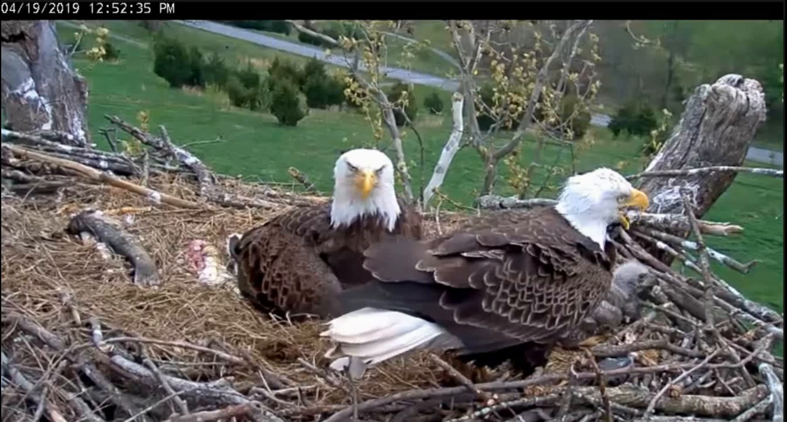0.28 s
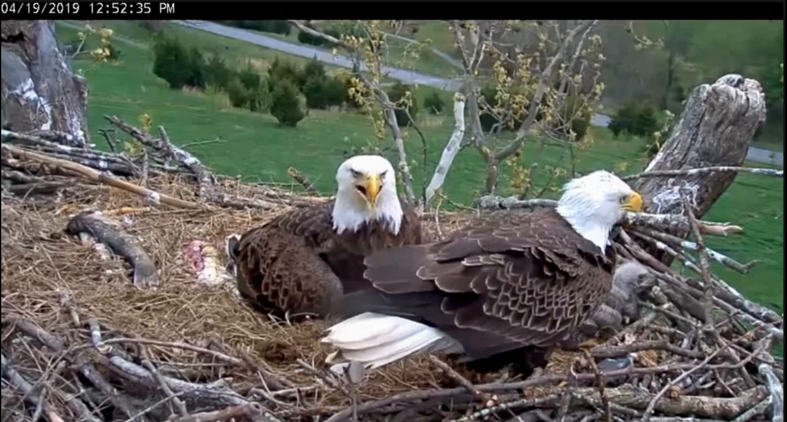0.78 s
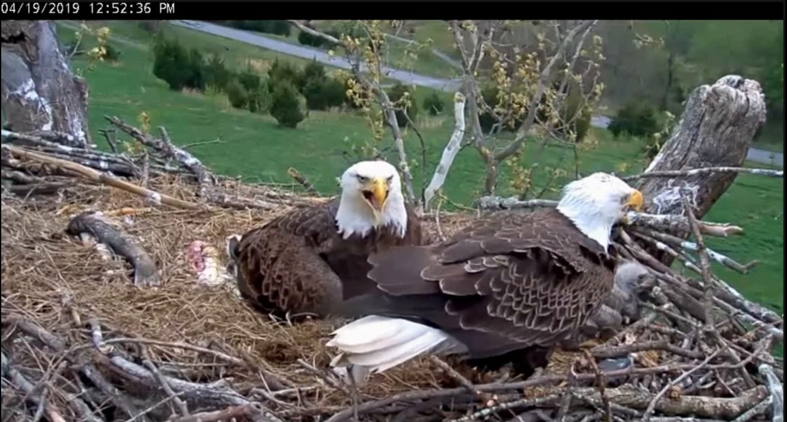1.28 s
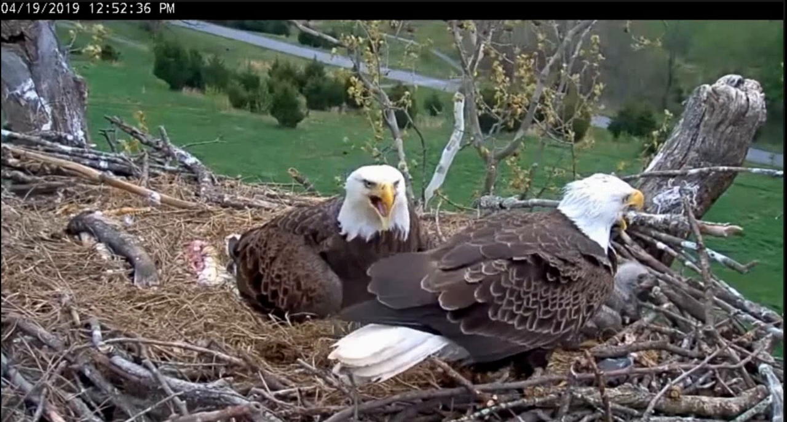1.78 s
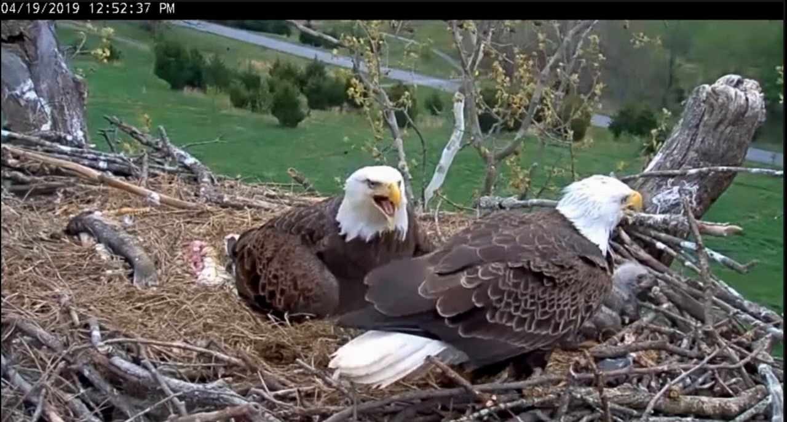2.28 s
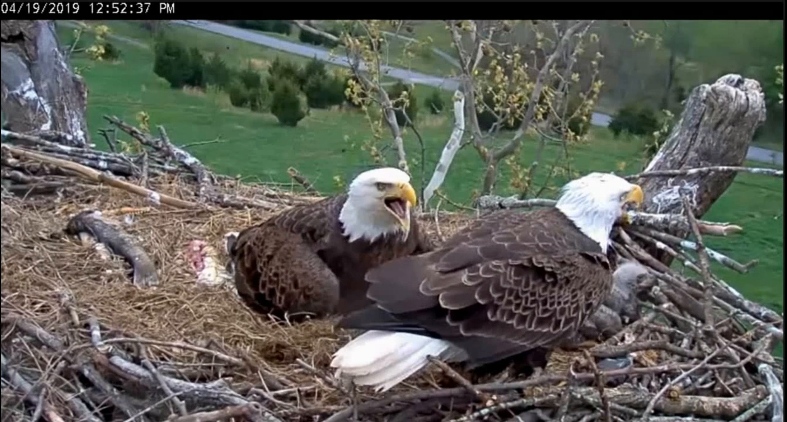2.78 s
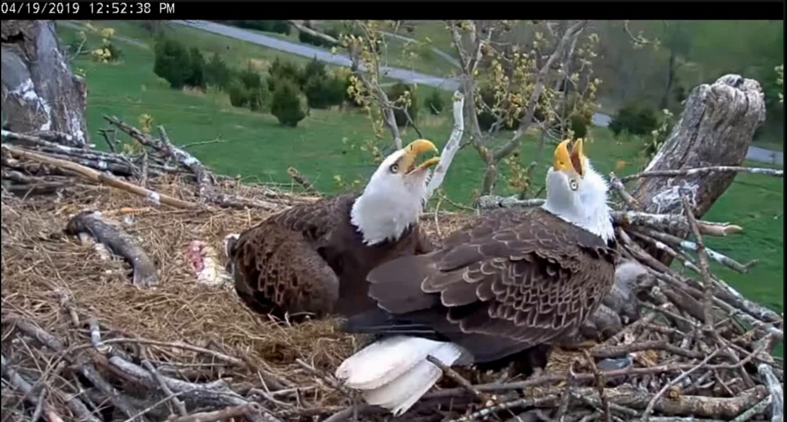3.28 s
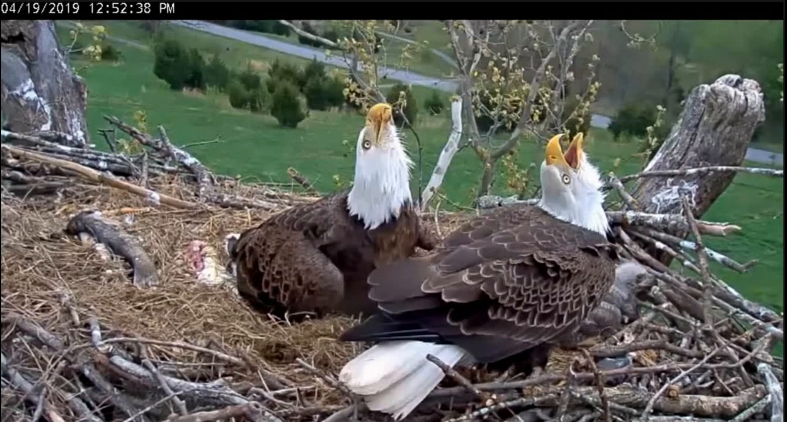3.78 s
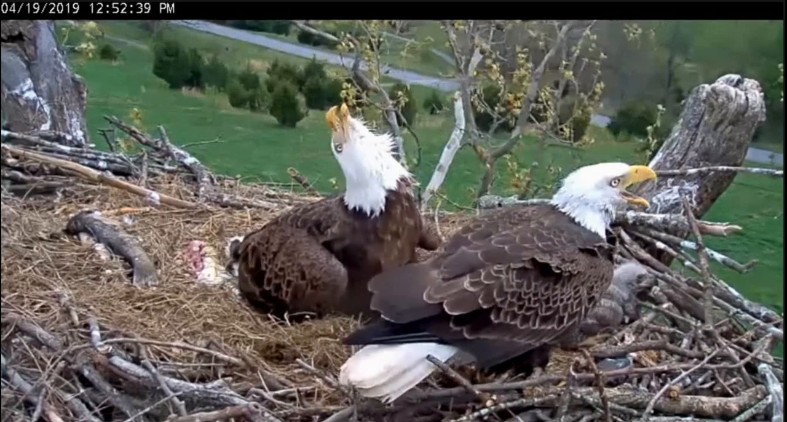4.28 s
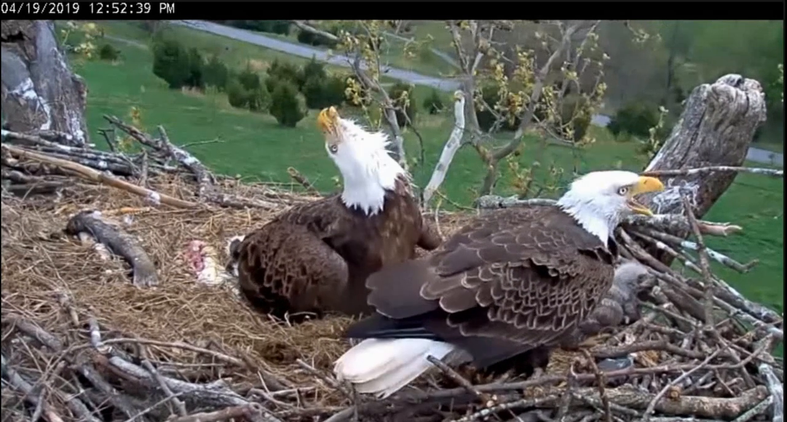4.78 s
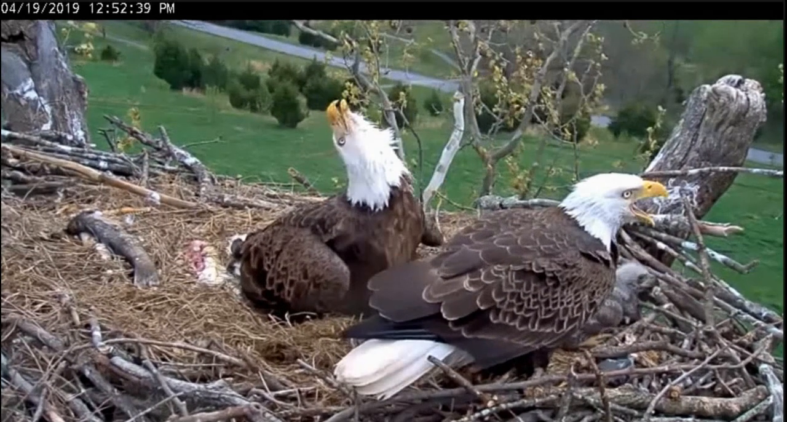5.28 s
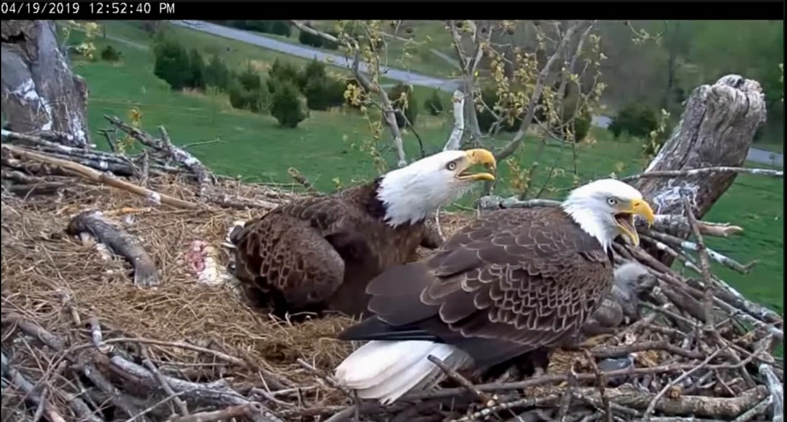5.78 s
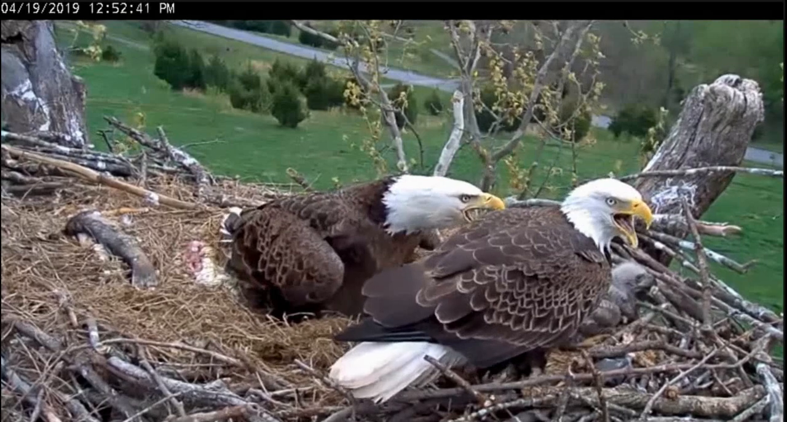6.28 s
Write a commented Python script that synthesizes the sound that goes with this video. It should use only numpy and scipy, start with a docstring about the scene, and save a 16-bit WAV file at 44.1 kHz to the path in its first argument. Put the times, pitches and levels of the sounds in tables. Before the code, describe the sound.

Two eagles give high piping peals, soft clucks and quick rasping squeaks close by, over wind rumbling on the microphone and faint songbirds.

```python
"""Bald eagles on their nest

Two eagles call close by: long piping peals, soft clucks, thin squeaks, then quick rasping runs.
The voice is a vibrating membrane that frays into noise when hoarse; open beaks hiss and clack shut.
A faint, broad hiss lingers around and after the opening peals.
Two far songbirds whistle, one speeding up into a trill; wind rumbles and thumps on the microphone."""
import sys
import numpy as np
from scipy import signal
from scipy.fft import rfft, irfft
from scipy.io import wavfile
from scipy.ndimage import map_coordinates

SR = 44100
rng = np.random.default_rng(int(sys.argv[2]) if len(sys.argv) > 2 else 0)


def int16_out(signal):
    """Quantize to a 16-bit WAV file."""
    q = np.round(np.clip(np.atleast_2d(signal).T, -1, 1) * 32767)
    wavfile.write(sys.argv[1], SR, q.astype(np.int16))


N = 289296
TIME = np.arange(N) / SR

# short hoarse notes: (time [s], length [s], start pitch [Hz], end pitch [Hz], base level [dB],
# octave boost [dB], third partial boost [dB]); a partial is one pure tone within a note
CLUCK_NOTES = [(0.072, 0.038, 1450, 1664, -31.5, 6, -1), (0.554, 0.029, 1432, 1620, -30.5, 9, -20.5),
               (0.89, 0.014, 1253, 1625, -36, 9.5, -1), (1.213, 0.025, 1043, 1140, -34, -21, -20),
               (1.221, 0.035, 2170, 2240, -34.5, -4.5, -24), (1.461, 0.012, 1020, 1000, -38.5, -15, -19),
               (1.582, 0.034, 2124, 2060, -38, -12, -18), (1.938, 0.036, 2173, 2190, -36, -0.5, -11),
               (2.206, 0.047, 2170, 2184, -38.5, -1, -0.5), (2.45, 0.042, 2380, 1960, -38.5, -3, -1.5),
               (2.685, 0.044, 2556, 2440, -37.5, -2.5, -16), (2.932, 0.041, 2650, 2360, -35, -0.5, -31),
               (3.188, 0.023, 2780, 2500, -29.5, -12, -35), (3.204, 0.021, 3070, 2610, -32, -15, -34),
               (4.591, 0.022, 3234, 2870, -42.5, -22, -24), (4.726, 0.017, 2240, 1750, -35, -19, -18.5),
               (4.817, 0.023, 2250, 2010, -34.5, -5, -11), (4.904, 0.014, 2250, 2060, -35.5, -5, -13),
               (6.264, 0.006, 2830, 2750, -32.5, -8, -30.5), (6.486, 0.03, 2260, 1920, -35.5, -11, -31)]


def pipes(third_db=-21, leak_db=-11, slack_db=10):
    """Peals and pipes: an arching whistle, firm while pushed, breaking into a rasp as it fades."""
    # two long peals and a rising yelp, one curve each: (time [s], pitch [Hz], level [dB])
    peal_curves = [
        [(0.092, 2466, -25.5), (0.106, 2555, -22.5), (0.134, 2602, -21), (0.156, 2546, -20.5),
         (0.196, 2358, -25.5), (0.224, 2473, -20), (0.244, 2448, -22), (0.264, 2390, -29.5), (0.274, 2230, -45)],
        [(0.571, 2610, -30.5), (0.581, 2490, -19.5), (0.603, 2605, -22), (0.621, 2505, -21.5),
         (0.651, 2373, -33.5), (0.662, 2380, -38)],
        [(0.897, 2240, -37), (0.904, 2285, -24), (0.916, 2486, -23.5), (0.921, 2580, -36), (0.94, 2480, -63)],
    ]
    # short notes: (time [s], length [s], hold [s], start pitch [Hz], end pitch [Hz], arch [Hz],
    # level [dB], octave's peak level [dB])
    pip_notes = [(0.685, 0.048, 0.026, 2486, 2447, 25, -25, -29.5),
                 (4.389, 0.021, 0.013, 2827, 2820, 17, -30, -45),
                 (4.404, 0.069, 0.03, 2430, 1994, -18.5, -35, -57),
                 (4.467, 0.096, 0.029, 2893, 2815, 93.5, -30, -28.5),
                 (4.574, 0.065, 0.011, 2896, 2996, -4.5, -30.5, -29),
                 (4.685, 0.079, 0.024, 2872, 2860, 17, -28.5, -33),
                 (4.798, 0.07, 0.012, 2766, 2810, -3, -34, -38.5),
                 (5.983, 0.054, 0.036, 2900, 2690, 69.5, -31.5, -40.5),
                 (6.029, 0.11, 0.083, 2743, 2760, 231, -30.5, -31.5),
                 (6.158, 0.078, 0.038, 2890, 2736, 110.5, -30.5, -31.5),
                 (6.275, 0.058, 0.033, 2917, 2800, 30, -32.5, -36),
                 (6.36, 0.071, 0.017, 2774, 2780, 15, -29.5, -36.5),
                 (6.465, 0.051, 0.0043, 2780, 2760, 6, -33, -41.5)]
    # the voices grow hoarser: (time [s], roughness [0-1])
    hoarseness = [(0, .2), (1, .2), (4.4, .41), (6.1, .45), (6.5, .6)]
    # air leaking past a hoarse note: (frequency [Hz], level [dB])
    leak_colour = [(400, -9), (1500, 13.5), (2400, 29), (3600, -13), (4500, -26), (5700, 4.5),
                   (7000, -26.5)]
    out = np.zeros(N)
    shake = unrest(jitter=.024, jitter_hz=280, flutter_db=15, flutter_hz=200)
    low_eddies, high_eddies, air = eddies(190), eddies(215), noise(leak_colour)
    for t, hz, level_db, octave_db in [peal(c) for c in peal_curves] + [pip(*n) for n in pip_notes]:
        at = np.rint(t * SR).astype(int)
        rough = np.interp(t, *np.transpose(hoarseness))
        # the note frays into noise as its push slackens, the octave first
        slack = np.minimum((level_db.max() - level_db) / slack_db, 1)
        fray = rough ** 2 * (.25 + 3.5 * slack)
        low, octave, third = syrinx(at, hz, rough, shake)
        low = blend(low, frayed(low_eddies[at], hz), fray)
        octave = blend(octave, frayed(high_eddies[at], 2 * hz), fray + .2)
        voice = gain_of(level_db) * low + gain_of(octave_db) * (octave + gain_of(third_db) * third)
        leak = gain_of(level_db + leak_db) * rough ** 1.5 * air[at]
        add(out, t[0], (voice + leak) * signal.windows.tukey(len(at), .06))
    return out


def peal(curve):
    """A long wavering note: returns its times, pitch, level and octave level."""
    # higher is brighter: (pitch [Hz], octave compared with the lowest partial [dB])
    brightness = [(2320, -16.5), (2460, -8.5), (2560, -6)]
    s, pitch, level_db = np.transpose(curve)
    at, _ = span(s[0], s[-1] - s[0])
    t = TIME[at]
    place = np.interp(t, s, np.arange(len(s)))
    hz = map_coordinates(pitch, [place], order=2, mode="nearest")  # rounded bends
    db = np.interp(t, s, level_db)
    return t, hz, db, db + look_up(brightness, hz)


def pip(s, length, hold, start_hz, end_hz, arch_hz, db, octave_db, attack_s=.0035, quiet_db=-31.5):
    """A short arching note that starts fast, holds, then fades; returns the same curves as peal."""
    at, u = span(s, length)
    held = np.clip(hold / length, .05, .95)
    hz = start_hz + (end_hz - start_hz) * u + arch_hz * np.sin(np.pi * u) ** 2
    onset_db = quiet_db * np.maximum(1 - u * length / attack_s, 0) ** 2
    fade_db = np.interp(u, [held, 1], [0, quiet_db])
    bloom_db = np.interp(u, [0, .78 * held, 1], [-16, 0, -28])  # the octave peaks late in the hold
    return TIME[at], hz, db + onset_db + fade_db, octave_db + onset_db + bloom_db


def clucks(fade_db=-11, bloom_db=7):
    """Lower notes from a slack voice box: they catch and die away, overtones ringing in the windpipe."""
    # a weak push is hoarser: (level [dB], roughness [0-1])
    hoarseness = [(-43, .62), (-36, .52), (-32, .28), (-22, .24)]
    out, turbulence = np.zeros(N), eddies(420)
    shake = unrest(jitter=.095, jitter_hz=380, flutter_db=14, flutter_hz=220)
    for s, length, start_hz, end_hz, db, octave_db, third_db in CLUCK_NOTES:
        at, u = span(s, length)
        rough = np.interp(db, *np.transpose(hoarseness))
        hz = start_hz + (end_hz - start_hz) * u
        low, octave, third = syrinx(at, hz, rough, shake)
        low = blend(low, frayed(turbulence[at], hz), 1.5 * rough ** 2)
        overtones = gain_of(octave_db) * windpipe(octave, through=.15)
        overtones += gain_of(third_db) * windpipe(third, through=.15)
        voice = low + gain_of(bloom_db * (u - 1.5)) * overtones
        add(out, s, swell(u, rise=.33) * gain_of(db + fade_db * u) * voice)
    return out


def squeaks():
    """The voice cracks into one high, harsh partial, about half noise, that rings in the windpipe."""
    # cracked notes: (time [s], length [s], start pitch [Hz], end pitch [Hz], level [dB])
    notes = [(0.403, 0.079, 4270, 4520, -44), (0.467, 0.13, 4560, 4600, -45.5),
             (0.669, 0.015, 5850, 6640, -36.5), (0.677, 0.034, 6600, 7170, -38.5),
             (0.9, 0.0093, 3780, 3870, -38.5), (0.91, 0.031, 4850, 5060, -42.5),
             (1.447, 0.023, 4640, 4500, -32.5), (3.128, 0.03, 4920, 5500, -43.5),
             (3.154, 0.04, 4900, 4340, -38.5), (3.198, 0.096, 5860, 5900, -46),
             (3.236, 0.077, 4760, 4700, -38.5), (3.342, 0.016, 4520, 4250, -35),
             (3.359, 0.023, 4700, 4530, -44.5), (4.383, 0.069, 5820, 6040, -43),
             (4.776, 0.081, 4340, 4590, -42), (4.896, 0.029, 4540, 4620, -32),
             (4.912, 0.031, 4770, 4670, -26), (4.913, 0.023, 5650, 5600, -39),
             (4.925, 0.0069, 6370, 6470, -40), (5.023, 0.023, 4400, 4410, -21),
             (5.043, 0.014, 4450, 4570, -25), (5.152, 0.0091, 4380, 4100, -33),
             (5.16, 0.015, 4410, 4340, -28.5)]
    # middling squeaks are the hoarsest: (level [dB], roughness [0-1])
    hoarseness = [(-46, .36), (-41, .55), (-22, .36)]
    out, turbulence = np.zeros(N), eddies(300)
    shake = unrest(jitter=.07, jitter_hz=420, flutter_db=12, flutter_hz=240)
    for s, length, start_hz, end_hz, db in notes:
        at, u = span(s, length)
        rough = np.interp(db, *np.transpose(hoarseness))
        hz = start_hz + (end_hz - start_hz) * u
        tone = syrinx(at, hz, rough, shake)[0]
        voice = blend(tone, frayed(turbulence[at], hz), rough)
        add(out, s, gain_of(db) * swell(u, rise=.22) * windpipe(voice, through=.25))
    return out


def syrinx(at, hz, rough, shake, dip=.57):
    """A bird's voice box: a membrane's three partials. Roughness shakes the pitch and dips the level."""
    jitter, flutter_db = shake
    phase = 2 * np.pi * np.cumsum(hz * (1 + rough * jitter[at])) / SR
    swings = [evened(gain_of(dip * rough * np.minimum(db[at], 0))) for db in flutter_db]
    return [np.sqrt(2) * swing * np.sin(k * phase) for k, swing in enumerate(swings, 1)]


def unrest(jitter, jitter_hz, flutter_db, flutter_hz):
    """The membrane moves unevenly: one pitch shake, and a level flutter for each of three partials."""
    return jitter * wobble(jitter_hz), flutter_db * np.array([wobble(flutter_hz) for _ in range(3)])


def eddies(hz):
    """Swirling air that smears a partial over about this many Hz each way."""
    return (wobble(hz) + 1j * wobble(hz)) / np.sqrt(2)


def frayed(turbulence, hz):
    """A partial that has broken up into a narrow band of noise."""
    return evened((turbulence * np.exp(2j * np.pi * np.cumsum(hz) / SR)).real)


def windpipe(x, through=0):
    """The windpipe rings at its own pitches; some of the sound can pass straight through."""
    # where the tube rings: (frequency [Hz], width [Hz], level [dB])
    resonances = [(2150, 420, -8), (3620, 380, -6), (4560, 400, 0), (5650, 440, 0), (6620, 440, -1)]
    hz = np.fft.rfftfreq(len(x), 1 / SR)
    tube = sum(gain_of(db) / (1 + ((hz - f) / width * 2) ** 2) for f, width, db in resonances)
    return evened(irfft(rfft(x) * (tube + through), len(x)))


def hisses(flutter_db=2):
    """Swells of hiss: broad noise mixed with a rasp that rings at the windpipe's pitches."""
    # first a faint, broad hiss lingering around and after the opening peals, then air through open
    # beaks: (time [s], length [s], level [dB], share that rings [0-1])
    swells = [(0.248, 0.83, -52, 0.1), (0.535, 0.052, -43, 0), (0.845, 0.41, -42.5, 0.02),
              (1.179, 0.29, -50.5, 0.01), (1.445, 0.18, -43, 0.27), (1.572, 0.013, -42.5, 0),
              (1.939, 0.12, -47, 0.7), (3.106, 0.22, -44.5, 0.2), (3.345, 0.048, -53, 0.9),
              (4.371, 0.093, -46, 0.9), (4.587, 0.061, -54.5, 0), (4.756, 0.076, -45, 0.1),
              (4.882, 0.071, -37, 0.98), (5.002, 0.052, -42.5, 0), (5.133, 0.057, -44, 0),
              (5.266, 0.075, -54.5, 0.22), (5.927, 0.12, -48, 0.2)]
    # the broad hiss: (frequency [Hz], level [dB])
    hiss_colour = [(300, 23), (1000, 7.5), (2200, 7), (3300, 7.5), (4500, 0), (6500, -16), (7400, -32)]
    puffs = [(s - .0045, .07, -53, .033) for s, *_ in CLUCK_NOTES]  # one with every cluck
    out, broad = np.zeros(N), noise(hiss_colour)
    ringing = windpipe(windpipe(rng.standard_normal(N)), through=.6)
    for s, length, db, share in list(swells) + puffs:
        at, u = span(s, length)
        add(out, s, gain_of(db) * swell(u, rise=.44) * blend(broad[at], ringing[at], share))
    return out * gain_of(flutter_db * wobble(48))


def clacks(attack_s=.0013):
    """The beak shuts: a hollow knock, with a bright crack when it snaps hard."""
    # hard, then soft: (time [s], time to fade 60 dB [s], level [dB], crack compared with knock [dB])
    snaps = [(1.199, 0.031, -33, 0.5), (1.214, 0.031, -35, -5.5), (2.026, 0.045, -45, -16),
             (2.28, 0.084, -45.5, -19.5), (2.519, 0.068, -45.5, -14.5), (2.755, 0.18, -49, -19),
             (3.006, 0.064, -45.5, -20)]
    # the hollow mouth: (frequency [Hz], level [dB])
    knock_colour = [(300, -9), (650, 5), (1080, -8), (1450, -3.5), (3200, -23), (5000, -30.5)]
    # the bright crack: (frequency [Hz], level [dB])
    crack_colour = [(800, -19), (2700, 1.5), (4200, -3.5), (5400, 5.5), (7100, 0.5), (7600, -21.5)]
    out, knock, crack = np.zeros(N), noise(knock_colour), noise(crack_colour)
    for s, fade_s, db, crack_db in snaps:
        at, u = span(s, fade_s)
        envelope = np.minimum(u * fade_s / attack_s, 1) * np.exp(-np.log(1000) * u)
        add(out, s, gain_of(db) * envelope * (evened(knock[at]) + gain_of(crack_db) * crack[at]))
    return out


def songbirds(whistle_hz=3810, fall_hz=83, sink_hz_per_s=69, vary_hz=30):
    """Two songbirds sing pure notes that slide quickly at first, then more slowly."""
    # one slides upward, quickening into a loose trill: (time [s], length [s], level [dB])
    slides = [(2.336, 0.28, -58.5), (2.655, 0.27, -58), (3.013, 0.17, -53), (3.281, 0.13, -50),
              (3.518, 0.21, -53.5), (3.692, 0.079, -52.5), (3.786, 0.043, -65), (3.911, 0.042, -53.5),
              (4.008, 0.045, -53.5), (4.093, 0.054, -56), (4.17, 0.062, -52), (4.246, .052, -49.5),
              (4.332, .042, -55), (4.435, 0.063, -52), (4.557, 0.058, -47.5), (4.639, 0.054, -48),
              (4.744, 0.022, -45)]
    # its slides widen: (time [s], start pitch [Hz], end pitch [Hz])
    slide_range = [(2.35, 3625, 3416), (2.651, 3305, 3446), (3.281, 3324, 3480), (3.521, 3270, 3745),
                   (3.7, 3216, 3730), (3.999, 3080, 3860), (4.2, 3256, 3870)]
    # the other's falling whistles, each lower than the last: (time [s], length [s], level [dB])
    whistles = [(1.695, 0.28, -67), (2.045, 0.4, -67), (2.276, 0.22, -60), (2.607, 0.098, -52.5),
                (2.963, 0.16, -53.5), (3.227, 0.076, -48.5), (3.432, 0.097, -51.5)]
    out, notes = np.zeros(N), []
    when, low_hz, high_hz = np.transpose(slide_range)
    for s, length, db in slides:
        glide_hz = np.interp(s, when, high_hz - low_hz) + vary_hz * rng.standard_normal()
        notes.append((s, length, db, np.interp(s, when, low_hz), glide_hz))
    for s, length, db in whistles:
        notes.append((s, length, db, whistle_hz - sink_hz_per_s * (s - whistles[0][0]), -fall_hz))
    for s, length, db, start_hz, glide_hz in notes:
        _, u = span(s, length)
        hz = start_hz + glide_hz * u ** .75
        tone = np.sqrt(2) * np.sin(2 * np.pi * np.cumsum(hz) / SR)
        add(out, s, gain_of(db) * swell(u, rise=.55) * tone)
    return out


def wind():
    """Swirling air shakes the microphone: a rumble, a lumpy flutter, and a rush in strong gusts."""
    # the wind rises and falls: (time [s], strength [dB])
    gusts = [(0.05, -33.5), (0.1, -41.5), (0.55, -28.5), (0.73, -40.5), (1.07, -32.5), (1.3, -47.5),
             (1.39, -38.5), (2.0, -42), (2.27, -28.5), (2.41, -47), (2.62, -31), (2.74, -34.5), (2.92, -32),
             (3.04, -27), (3.12, -29), (3.22, -24.5), (3.42, -32.5), (3.73, -37.5), (3.89, -31.5),
             (3.91, -44.5), (4.63, -48), (4.7, -29), (4.86, -33), (4.98, -26), (5.09, -25.5), (5.36, -34),
             (5.92, -35.5), (5.97, -27), (6.04, -34.5), (6.24, -23.5), (6.52, -21.5)]
    # the deep rumble: (frequency [Hz], level [dB])
    rumble_colour = [(10, -16.5), (18, 9), (30, -2), (48, 1), (70, -4), (100, -6.5), (150, -21.5),
                     (300, -48.5), (1000, -99.5)]
    # the flutter above it: (frequency [Hz], level [dB])
    flutter_colour = [(40, -6), (90, -0.5), (140, 10.5), (210, 2), (310, -6.5), (430, -18), (700, -27.5),
                      (1200, -35.5), (2500, -41), (7000, -68.5)]
    # strong gusts reach higher: (frequency [Hz], level [dB])
    rush_colour = [(120, -35.5), (230, -2), (320, 7), (450, -9), (700, -16.5), (1400, -67)]
    gust_db = np.interp(TIME, *np.transpose(gusts))
    lumps = evened(gain_of(1.8 * wobble(24)))
    rumble = noise(rumble_colour) * gain_of(-22 + .64 * (gust_db + 33.5))  # follows gusts gently
    flutter = noise(flutter_colour) * gain_of(gust_db - 3)
    rush = noise(rush_colour) * gain_of(-42 + 2.34 * (gust_db + 26))  # follows them steeply
    return rumble + lumps * (flutter + rush)


def thumps():
    """Single swirls of air strike the microphone with short, dull thumps."""
    # each strike: (time [s], length [s], level [dB])
    strikes = [(0.011, 0.059, -33), (0.179, 0.026, -32.5), (0.54, 0.031, -25.5), (0.845, 0.041, -27),
               (0.962, 0.028, -35.5), (2.025, 0.049, -34), (2.257, 0.037, -35.5), (2.656, 0.053, -24),
               (2.779, 0.041, -27), (2.843, 0.045, -24), (2.952, 0.083, -28), (3.176, 0.082, -24),
               (3.369, 0.069, -25.5), (3.495, 0.025, -31.5), (3.636, 0.046, -31.5), (3.777, 0.041, -29.5),
               (4.721, 0.074, -27.5), (4.906, 0.05, -25.5), (4.978, 0.06, -25.5), (5.058, 0.11, -26.5),
               (5.298, 0.047, -30), (5.962, 0.062, -33), (6.403, 0.07, -25.5)]
    # the dull thump: (frequency [Hz], level [dB])
    thump_colour = [(20, -2), (55, 2.5), (130, 8), (220, -0.5), (320, -3.5), (450, -19), (800, -29),
                    (2000, -69)]
    out, thump = np.zeros(N), noise(thump_colour)
    for s, length, db in strikes:
        at, u = span(s, length)
        add(out, s, gain_of(db) * swell(u, rise=.45) * evened(thump[at]))
    return out


def branch_echoes(x, fade_times, delay_s, echoes_per_s=2500):
    """Sound bounces off many branches at random, each frequency dying away at its own speed."""
    echoes = rng.standard_normal(SR) * (rng.random(SR) < echoes_per_s / SR) * (TIME[:SR] > delay_s)
    hz, t, bands = signal.stft(echoes, SR, nperseg=256)
    fade = gain_of(-60 * t / look_up(fade_times, hz)[:, None])
    _, tail = signal.istft(bands * fade, SR, nperseg=256)
    return signal.fftconvolve(x, tail / np.linalg.norm(tail))[:N]


def hush(level_db=-60.5):
    """The faint, steady sound of the outdoors."""
    # open air: (frequency [Hz], level [dB])
    air_colour = [(100, 1.5), (500, 14), (1000, 8), (2000, 3), (3500, 3), (5000, -1), (6700, 0.5),
                  (7300, -35.5)]
    return gain_of(level_db) * noise(air_colour)


def gain_of(db):
    """Turns decibels into a number to multiply by."""
    return 10 ** (np.asarray(db) / 20)


def evened(x):
    """Scales a sound to an average power of 1."""
    return x / np.sqrt(np.mean(x ** 2) + 1e-20)


def look_up(points, hz):
    """Reads between a table's rows, with frequency spaced in octaves."""
    f, value = np.transpose(points)
    return np.interp(np.log(hz + 1), np.log(f + 1), value)


def add(mix, s, sound):
    """Mixes a sound in at s seconds."""
    part = mix[round(s * SR):][:len(sound)]
    part += sound[:len(part)]


def blend(a, b, share):
    """Mixes two sounds, giving b this share of the power."""
    share = np.clip(share, 0, 1)
    return np.sqrt(1 - share) * a + np.sqrt(share) * b


def noise(colour):
    """Steady noise of power 1; its colour is the balance of low and high frequencies."""
    gains = gain_of(look_up(colour, np.fft.rfftfreq(N, 1 / SR)))
    return evened(irfft(rfft(rng.standard_normal(N)) * gains, N))


def wobble(hz):
    """Random drift up to about this rate."""
    damping = 1 + (np.fft.rfftfreq(N, 1 / SR) / hz) ** 4
    return evened(irfft(rfft(rng.standard_normal(N)) / damping, N))


def span(s, length):
    """A note's sample positions (at) and its progress from 0 to 1 (u)."""
    at = np.arange(max(round(s * SR), 0), min(round((s + max(length, .004)) * SR), N))
    return at, np.linspace(0, 1, len(at))


def swell(u, rise):
    """A rounded rise and fall, peaking when the progress u reaches rise."""
    return np.sin(np.pi / 2 * np.interp(u, [0, rise, 1], [0, 1, 0])) ** .8


def scene():
    """Near eagles with little echo; far songbirds, blurred by the trees; wind and hush."""
    # how long the woods echo: (frequency [Hz], time to fade 60 dB [s])
    woods_fade = [(500, 15), (2500, 1.1), (3600, 2.5), (4400, 0.5), (7000, 1.3)]
    eagles = pipes() + clucks() + squeaks() + hisses() + clacks()
    song = songbirds()
    nest = gain_of(-17) * branch_echoes(eagles, [(500, .06), (7000, .05)], delay_s=.004)
    woods = gain_of(-30) * branch_echoes(eagles, woods_fade, delay_s=.02)
    add(woods, .052, gain_of(-25) * eagles)  # one echo stands out
    far_song = gain_of(-1) * song + gain_of(-4) * branch_echoes(song, woods_fade, delay_s=.0022)
    return (eagles + nest + woods + far_song + wind() + thumps() + hush())[None]


def record(dry, ceiling=.48, top_hz=7520):
    """Rounds off the biggest gusts, then cuts the highest treble."""
    rounded = dry / (1 + (dry / ceiling) ** 8) ** (1 / 8)
    treble_cut = signal.firwin(511, top_hz, window=("kaiser", 9), fs=SR)
    return signal.oaconvolve(rounded, treble_cut[None], "same")


dry = scene()
out = record(dry)
int16_out(out)
```